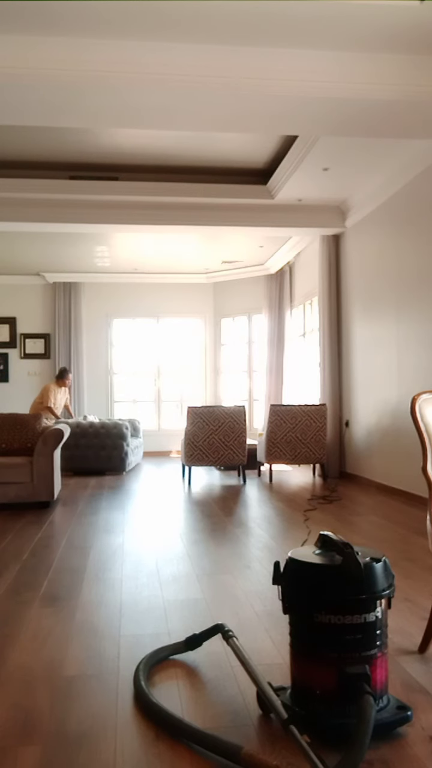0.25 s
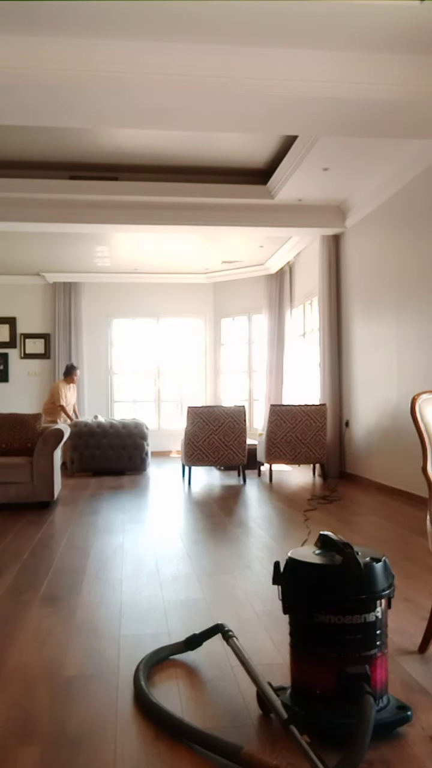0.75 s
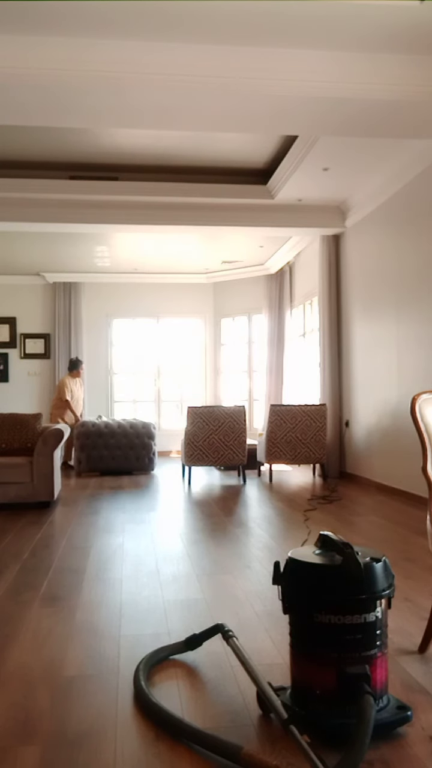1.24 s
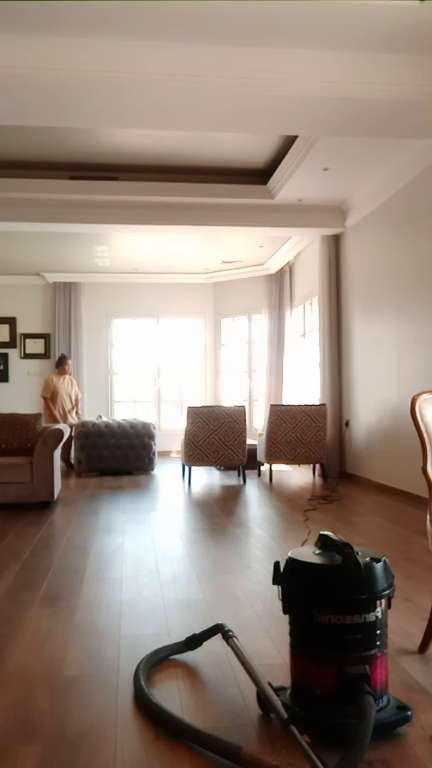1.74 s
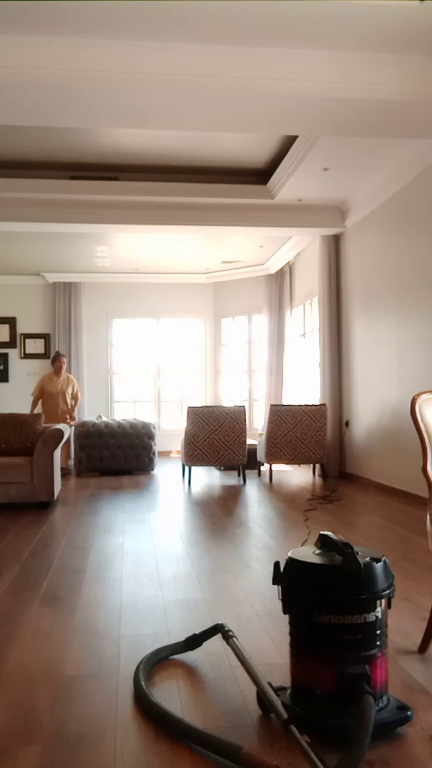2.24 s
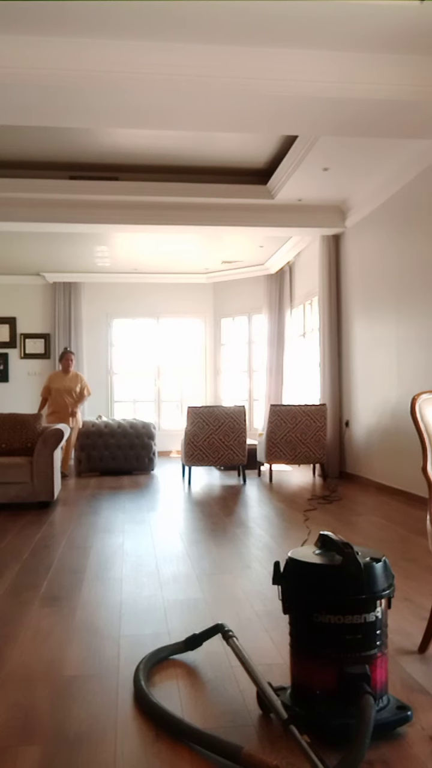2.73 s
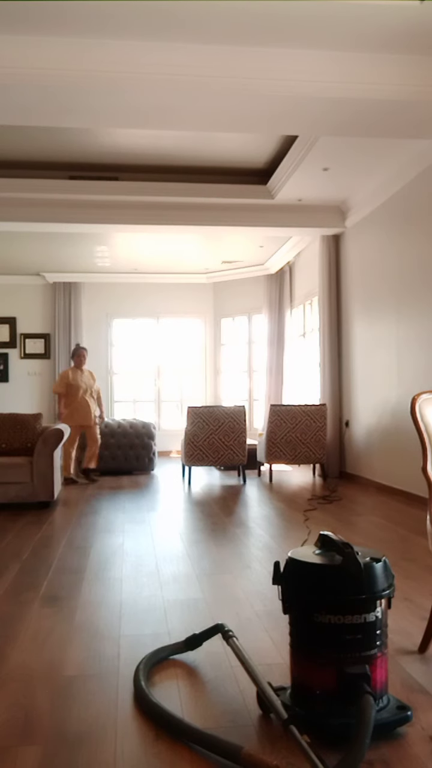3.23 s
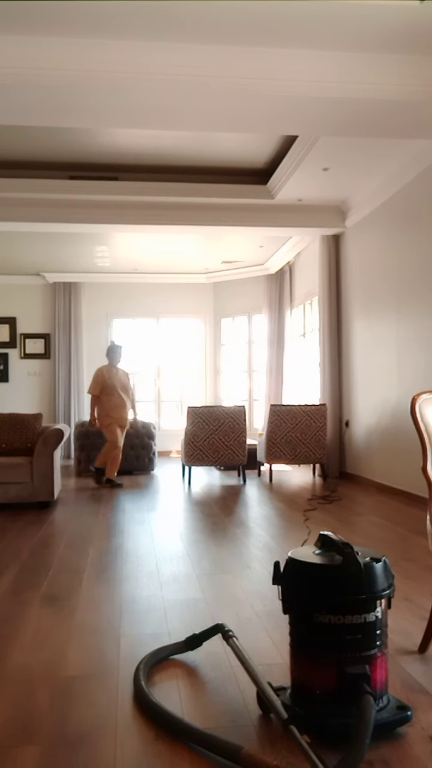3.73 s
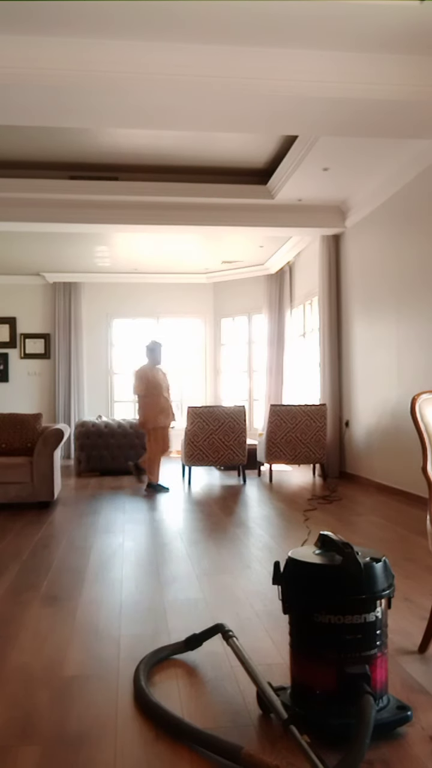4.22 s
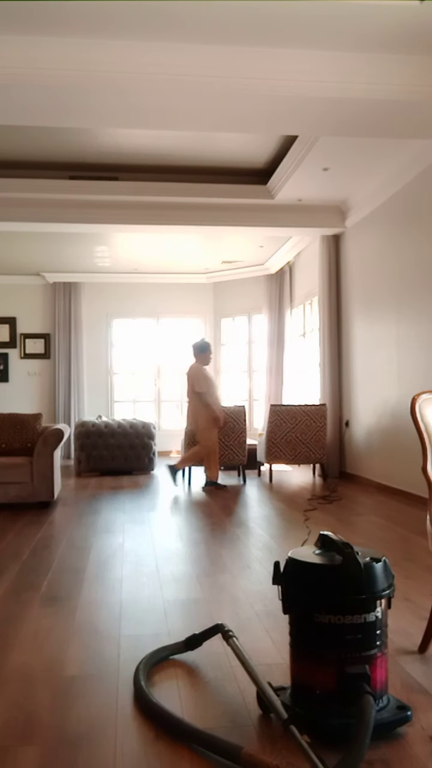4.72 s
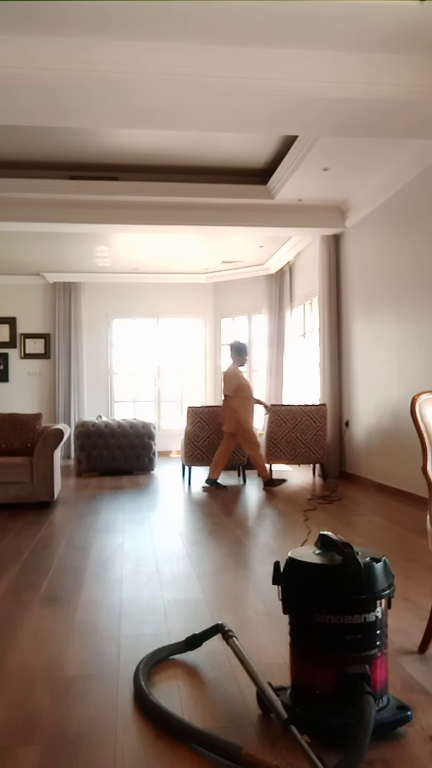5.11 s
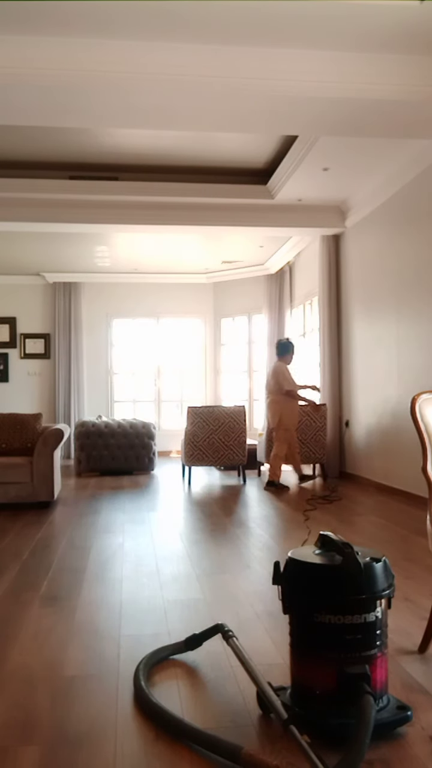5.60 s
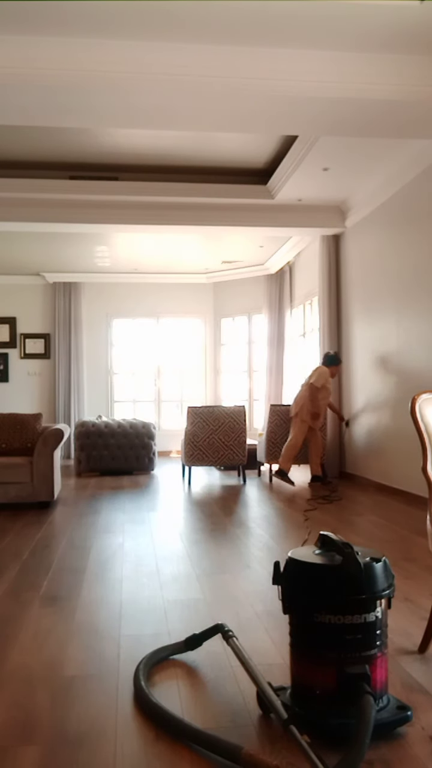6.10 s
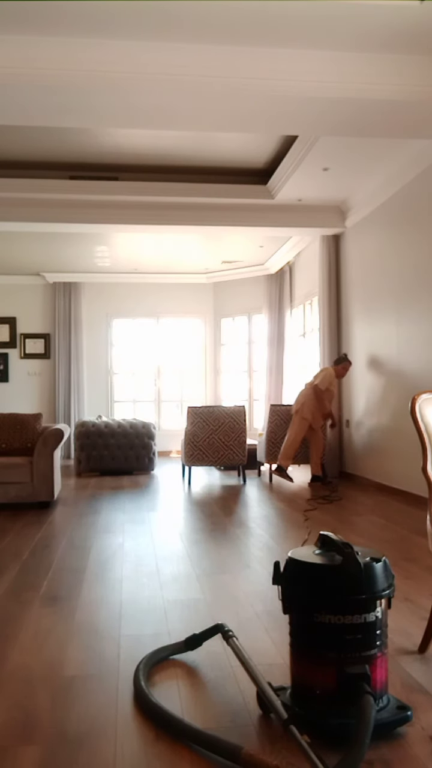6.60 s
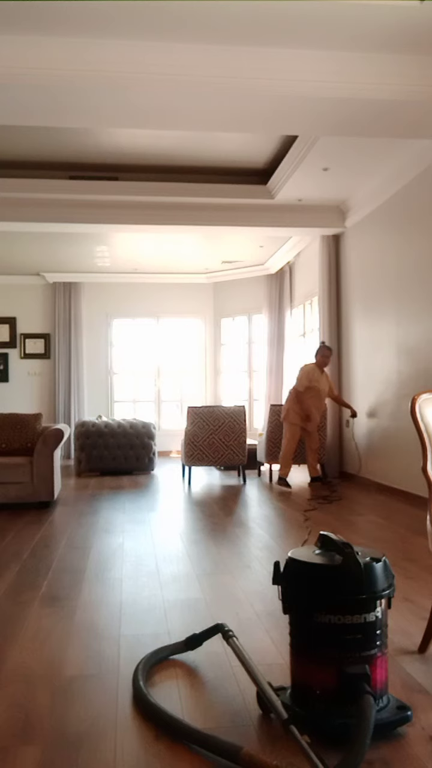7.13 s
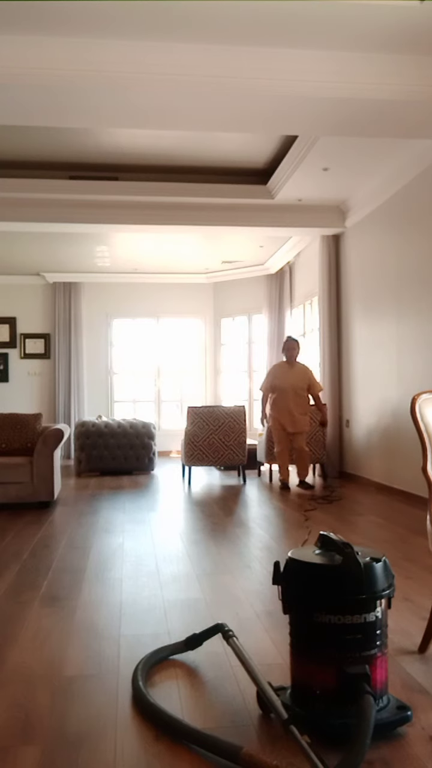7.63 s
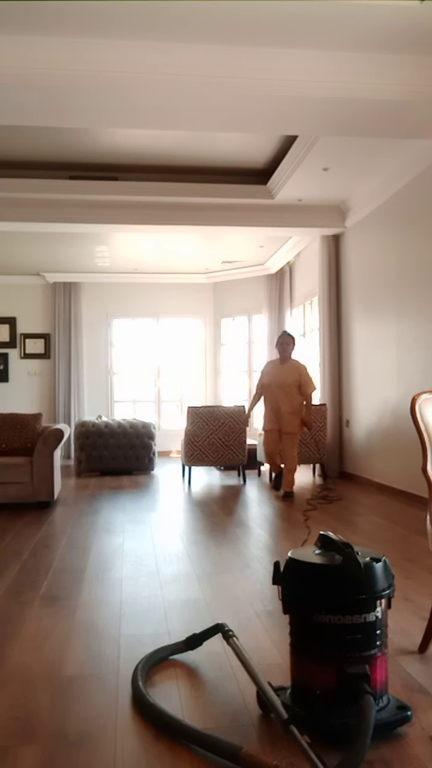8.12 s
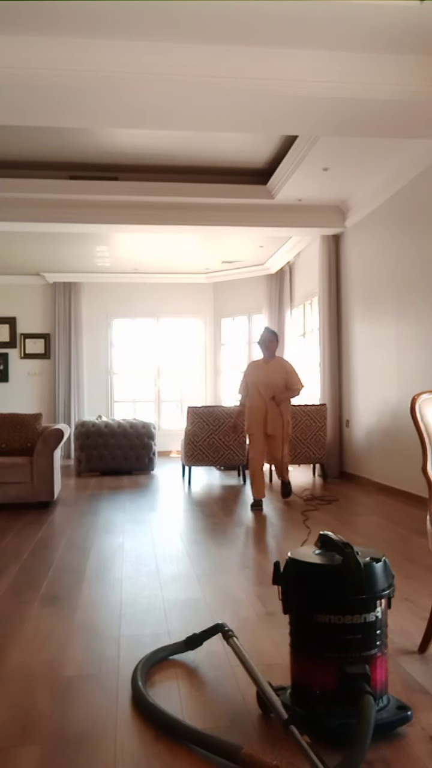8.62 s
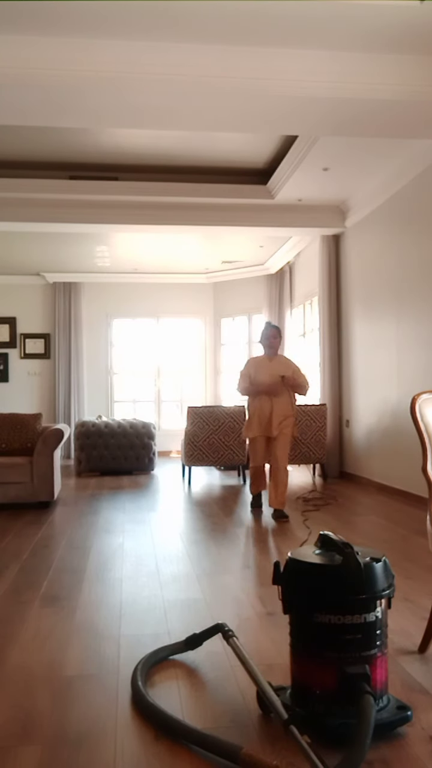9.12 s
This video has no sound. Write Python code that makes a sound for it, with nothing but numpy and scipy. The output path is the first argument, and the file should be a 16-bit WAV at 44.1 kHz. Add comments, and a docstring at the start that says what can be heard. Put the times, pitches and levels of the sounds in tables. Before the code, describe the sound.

A canister vacuum roars with rushing air and a high whine, is unplugged, winds down in a long falling glide, then a few slippered steps approach.

```python
"""In a living room with a hard floor, a canister vacuum cleaner runs, is unplugged at 6.5 s and coasts down.
Filtered noise makes the rushing air, the low gusts and a broad fan whistle, all following the shaft speed.
Sines locked to the shaft make the motor's tones and hum, which glide through fixed resonances.
Dull bumps sound at the wall socket; then come a few steps, probably in slippers, with ever louder slaps.
Steps and bumps are short bursts of band noise, and a quiet room noise lies under everything."""
import sys
import numpy as np
from scipy import signal
from scipy.fft import rfft, irfft
from scipy.io import wavfile
from scipy.ndimage import uniform_filter1d

SR = 44100
rng = np.random.default_rng(int(sys.argv[2]) if len(sys.argv) > 2 else 0)


def wav_record(signal):
    """Record a signal, one row per channel, as 16-bit PCM in the file named by sys.argv[1]."""
    frames = np.transpose(np.atleast_2d(signal))
    bounded = np.clip(frames, -1, 1)
    # unit amplitude maps onto the largest positive 16-bit level
    quanta = np.round(bounded * 32767).astype(np.int16)
    wavfile.write(sys.argv[1], SR, quanta)


N = 412335
TIME = np.arange(N) / SR
FULL_HZ = 608.3  # shaft turns per second under power


def amp(db):
    """Decibels to gain."""
    return 10 ** (np.asarray(db) / 20)


def spectrum(points, hz):
    """A spectrum in dB, read between its points on a log-frequency axis."""
    point_hz, db = np.transpose(points)
    return np.interp(np.log(hz + 1), np.log(point_hz + 1), db)


def bells(modes, hz):
    """Summed gain in dB of a set of resonances (above zero) and dips (below zero)."""
    return sum(db / (1 + (2 * (hz - centre_hz) / width_hz) ** 2) for centre_hz, width_hz, db in modes)


def white(size):
    """White noise of unit power per Hz."""
    return rng.standard_normal(size) * np.sqrt(SR / 2)


def wander(rate_hz):
    """Slow random drift with a standard deviation of one."""
    hz = np.fft.rfftfreq(N, 1 / SR)
    drift = irfft(rfft(rng.standard_normal(N)) / (1 + (hz / rate_hz) ** 2), N)
    return drift / drift.std()


def speed(t):
    """Shaft speed as a share of full speed: steady, then braked by air drag and bearing friction."""
    off_s = 6.516
    air_drag_s = 1.3803  # time in which air drag alone would halve the speed
    bearing_s = 13.51  # time constant of the bearing friction
    slowing = np.expm1(np.maximum(t - off_s, 0) / bearing_s)
    return 1 / (1 + slowing * (1 + bearing_s / air_drag_s))


def rush_db(t, full_speed_db=1.0, db_per_octave=12):
    """Level of the moving air, which drops with each halving of the shaft speed."""
    return full_speed_db + db_per_octave * np.log2(speed(t))


def rush(flutter_db=1.0):
    """Turbulent air in the hose and exhaust: fluttering noise that weakens as the fan slows."""
    _, t, noise = signal.stft(white(N), SR, nperseg=1024, noverlap=768)
    _, air = signal.istft(noise * amp(rush_db(t)), SR, nperseg=1024, noverlap=768)
    return air[:N] * amp(flutter_db * wander(23))


def whistle(glide=0.8, flutter_db=0.35, coasting_flutter_db=1.0, rolloff_db=10):
    """Eddies shed by the blades make a broad whistle that sinks, and flutters more, as the fan coasts."""
    # Shape of the whistle at full speed. Each row: frequency in Hz, relative level in dB.
    whistle_shape = [(1500, -60), (3000.0, -8), (6000.0, 2), (7500.0, 8), (8300.0, 10), (9000.0, 15.5),
                     (9700.0, 18), (10500.0, 9.5), (12000.0, 1.5), (16000.0, -5)]
    # Exhaust cavities that the whistle sweeps through. Each row: centre in Hz, width in Hz, gain in dB.
    cavities = [(1960, 1200, -6), (3380, 250, 1.5), (3745, 380, -10.5), (4374, 190, -8.5), (4550, 180, 6),
                (4880, 160, -6), (10800, 3800, -1.5), (14900, 800, 9)]
    level_db, holds_to_speed, fade_db_per_octave = -3, 0.47, 11.5  # the fade starts below this share of speed

    hz, t, noise = signal.stft(white(N), SR, nperseg=1024, noverlap=768)
    # where each frequency would lie at full speed
    full_speed_hz = hz[:, None] / speed(t) ** glide
    octaves_above = np.log2(np.maximum(full_speed_hz / whistle_shape[-1][0], 1))
    shape_db = spectrum(whistle_shape, full_speed_hz) - rolloff_db * octaves_above
    fade_db = fade_db_per_octave * np.minimum(np.log2(speed(t) / holds_to_speed), 0)
    db = level_db + fade_db + shape_db + bells(cavities, hz)[:, None]
    _, air = signal.istft(noise * amp(db), SR, nperseg=1024, noverlap=768)
    depth_db = np.interp(speed(TIME), [.75, 1], [coasting_flutter_db, flutter_db])
    return air[:N] * amp(depth_db * wander(40))


def motor():
    """Tones locked to the shaft: nearly steady in pitch under power, uneven and fading as it coasts."""
    # Tones of the nine-bladed fan and the commutator. Each row: multiple of the shaft rate,
    # relative level at half speed in dB, rise in dB per doubling of speed.
    shaft_tones = [(4, 7, 6), (5, 1, 8), (6, 7, 8), (7, 3, 8), (9, 5, 22), (22, 12, 4), (27, 18, 6),
                   (36, 13, 12), (45, 9, 10), (54, 6, 8), (66, 4, 6)]
    # Housing panels that ring (or, below zero, damp) as a tone sweeps past.
    # Each row: centre in Hz, width in Hz, gain in dB.
    panels = [(760, 250, -8), (1245, 55, 11), (4000, 250, 8), (6500, 800, 7), (8400, 500, 4),
              (11000, 1800, 7), (13900, 500, 4)]

    coasting = np.clip(4 * (1 - speed(TIME)), 0, 1)  # 0 under power, 1 below three quarters of full speed
    unevenness = (.0002 + .002 * coasting) * wander(20)
    shaft_hz = FULL_HZ * speed(TIME) * (1 + unevenness)
    angle = 2 * np.pi * np.cumsum(shaft_hz) / SR
    octaves = np.log2(2 * speed(TIME))
    waver = wander(21)
    waver_db = 1.5 + 1.5 * coasting
    out = np.zeros(N)
    for order, db, slope_db in shaft_tones:
        hz = order * shaft_hz
        # each tone wavers at its own moments
        own_waver_db = waver_db * np.roll(waver, rng.integers(N))
        level_db = db + slope_db * octaves + bells(panels, hz) + own_waver_db
        out += amp(level_db) * np.sin(order * angle) * (hz < SR / 2)
    return np.sqrt(2) * out


def hum():
    """The rotor shakes the canister once a turn; the hum swells in each resonance that it sinks through."""
    # Resonances of canister and room. Each row: centre in Hz, width in Hz, peak level in dB before the nulls.
    hum_modes = [(181, 16, -52.5), (212, 20, -48.5), (221, 7, -41), (232, 6, -43.5), (243, 11, -42),
                 (254, 15, -52.5), (300, 50, -63), (422, 140, -58), (590, 130, -53)]
    # Nulls between them, where the hum drops out. Each row: centre in Hz, width in Hz, gain in dB.
    hum_nulls = [(203, 8, -9), (227, 3, -14), (237.5, 2.5, -11)]

    hz = FULL_HZ * speed(TIME)
    gain = sum(amp(db) / (1 + (2 * (hz - centre_hz) / width_hz) ** 2) ** 2
               for centre_hz, width_hz, db in hum_modes)
    gain = gain * amp(bells(hum_nulls, hz))
    return np.sqrt(2) * gain * np.sin(2 * np.pi * np.cumsum(hz) / SR)


def buffeting(db=-2):
    """Lumpy low gusts from the exhaust, dying quickly with the air flow."""
    band = signal.butter(2, [70, 340], "band", fs=SR, output="sos")
    low = signal.sosfilt(band, white(N))
    gusts_db = 4 * wander(9)
    return low * amp(db + gusts_db + rush_db(TIME)) * speed(TIME)


def add(mix, start_s, sound):
    """Lays a sound into the mix at its start time."""
    part = mix[round(start_s * SR):][:len(sound)]
    part += sound[:len(part)]


def burst(low_hz, high_hz, rise, decay):
    """A puff of band noise that swells and dies; rise and decay are time constants in seconds."""
    t = TIME[:SR // 2]
    band = signal.butter(2, [low_hz, high_hz], "band", fs=SR, output="sos")
    puff = white(len(t)) * (1 - np.exp(-t / rise)) * np.exp(-t / decay)
    return signal.sosfilt(band, puff)


def footsteps():
    """The heel thuds, the slipper slaps and the sole scuffs the floor, each as bursts of noise."""
    # Each row: time of the slap in seconds, then relative levels in dB of heel thud, sole slap and scuff.
    steps = [(8.335, 12, -20, -6), (8.834, -12, 3, -16), (9.104, 6, 12.5, -2), (9.340, 2, 15, 0)]
    out = np.zeros(N)
    for s, thud_db, slap_db, scuff_db in steps:
        # heel and first scrape start 6 ms ahead of the slap
        add(out, s - .006, amp(thud_db) * burst(low_hz=407, high_hz=580, rise=.003, decay=0.047))
        add(out, s - .006, amp(scuff_db) * burst(low_hz=1290, high_hz=2640, rise=0.00046, decay=0.027))
        add(out, s, amp(slap_db) * burst(low_hz=5800, high_hz=11000, rise=.0002, decay=.0028))
        add(out, s, amp(scuff_db) * burst(low_hz=2540, high_hz=5500, rise=0.027, decay=0.11))
    return out


def bumps():
    """Dull knocks at the wall socket: short bursts of low noise."""
    # Each row: start in seconds, relative level in dB.
    knocks = [(6.545, 24), (6.599, 23), (6.68, 15), (7.26, 3)]
    out = np.zeros(N)
    for s, db in knocks:
        add(out, s, amp(db) * burst(low_hz=35, high_hz=146, rise=0.01, decay=0.045))
    return out


def room_tone():
    """The quiet room: steady noise, strongest in the lows."""
    # Each row: frequency in Hz, level in dB per Hz.
    quiet_room = [(20, -107), (60, -92.5), (150, -85.5), (400, -99), (2000, -108), (15000, -125)]
    hz = np.fft.rfftfreq(N, 1 / SR)
    return irfft(rfft(white(N)) * amp(spectrum(quiet_room, hz)), N)


def reflect(x, t60, wet_db):
    """Adds a cloud of dying reflections and scales down for their added power."""
    t = TIME[:SR // 2]
    tail = rng.standard_normal(len(t)) * amp(-60 * t / t60) * (t > .003)
    tail *= amp(wet_db) / np.linalg.norm(tail)
    return (x + signal.fftconvolve(x, tail)[:N]) / np.sqrt(1 + amp(wet_db) ** 2)


def coloured(x, size=16384):
    """The fixed colour and resonances of the path to the microphone, as a causal minimum-phase filter."""
    # Broad colour of the path. Each row: frequency in Hz, gain in dB before the resonances.
    path_colour = [(25.0, -91), (55.0, -102.5), (100.0, -87), (200.0, -76), (480.0, -83.5), (680.0, -66),
                   (1000.0, -72.5), (1600.0, -66), (4000.0, -68), (8200.0, -75), (11500.0, -85),
                   (14000.0, -83.5), (14700.0, -71), (15500.0, -70.5)]
    # Narrow resonances and notches on the path. Each row: centre in Hz, width in Hz, gain in dB.
    path_resonances = [(102.0, 10.0, 4.0), (143.0, 20.0, 7.0), (200.0, 18.0, 8.1), (308.0, 70.0, 7.4),
                       (774.0, 209.0, 10.0), (1258.0, 178.0, 14.8), (2288.0, 76.0, -4.7),
                       (3100.0, 255.0, 3.0), (4503.0, 180.0, 9.0), (4932.0, 131.0, -1.2),
                       (5564.0, 75.0, 5.6), (5896.0, 533.0, 10.1), (6133.0, 294.0, 8.1),
                       (6727.0, 72.0, 3.8), (6877.0, 174.0, 12.2), (7136.0, 248.0, 12.3),
                       (7235.0, 50.0, 5.6), (7346.0, 150.0, 13.1), (7501.0, 129.0, 15.3),
                       (7615.0, 73.0, 9.1), (7784.0, 106.0, 11.3), (8664.0, 71.0, 11.9),
                       (8758.0, 61.0, 11.4), (8916.0, 186.0, 7.7), (9094.0, 116.0, 11.1),
                       (9690.0, 58.0, 6.4), (10141.0, 92.0, 9.4), (10949.0, 153.0, 6.2),
                       (12046.0, 74.0, 11.1), (13126.0, 91.0, 8.7), (14259.0, 139.0, 8.6)]

    hz = np.fft.rfftfreq(size, 1 / SR)
    db = spectrum(path_colour, hz) + bells(path_resonances, hz)
    log_gain = np.log(amp(np.r_[db, db[-2:0:-1]]))
    # the Hilbert transform of the log gain gives the phase
    response = np.exp(np.conj(signal.hilbert(log_gain)))
    ring = irfft(response[:len(hz)])
    return signal.fftconvolve(x, ring[:size // 4])[:N]


def limited(x):
    """A limiter: turns the gain down quickly when the sound is loud, and lets it come back slowly."""
    threshold_db, ratio, recover_db_per_s = -17.0, 4.2, 30
    power = uniform_filter1d((x ** 2).mean(0), size=600)
    power_db = 10 * np.log10(abs(power) + 1e-12)
    # a peak hold that sinks at the recovery rate
    recovery = recover_db_per_s * TIME
    held_db = np.maximum.accumulate(power_db + recovery) - recovery
    over_db = np.maximum(held_db - threshold_db, 0)
    return x * amp(-(1 - 1 / ratio) * uniform_filter1d(over_db, size=300))


def scene():
    """Cleaner, bumps and walker in the room, with the same sound in both channels."""
    air = reflect(rush() + whistle() + buffeting(), t60=.12, wet_db=-9.5)
    tones = reflect(motor(), t60=.4, wet_db=-6)
    walker_and_bumps = reflect(footsteps() + bumps(), t60=0.37, wet_db=-14.0)
    mono = coloured(air + tones + walker_and_bumps) + hum() + room_tone()
    return np.tile(mono, (2, 1))


def record(dry):
    """The limiter holds down the loud passages; then a steep low-pass cuts the top of the treble."""
    low_pass = signal.firwin(1023, 15530, window=("kaiser", 9), fs=SR)  # cutoff in Hz
    return signal.oaconvolve(limited(dry), low_pass[None], "same", axes=1)


dry = scene()
out = record(dry)
wav_record(out)
```